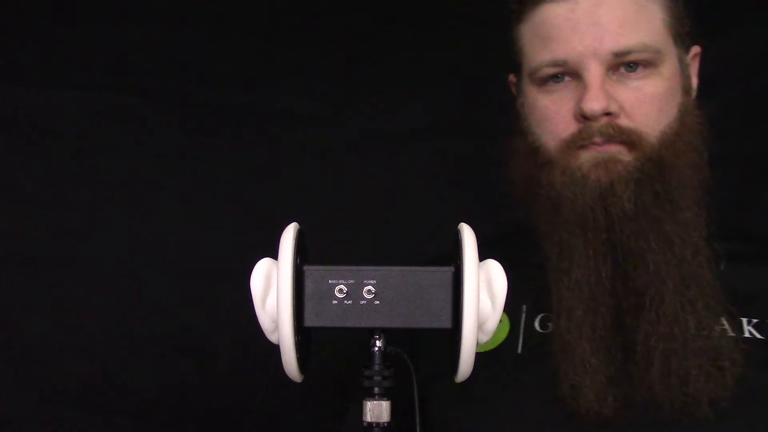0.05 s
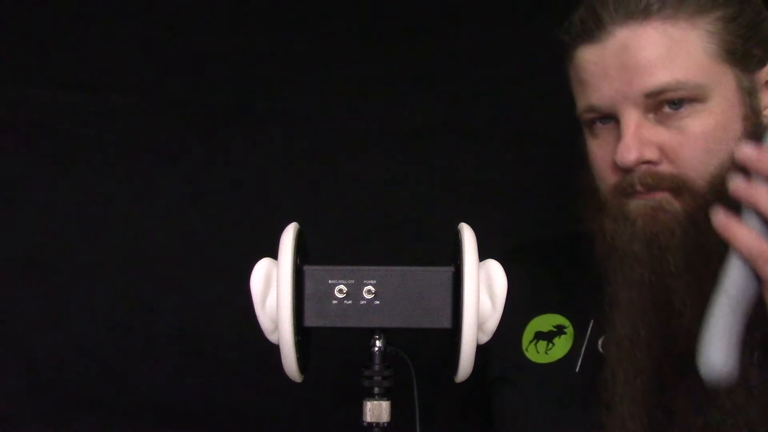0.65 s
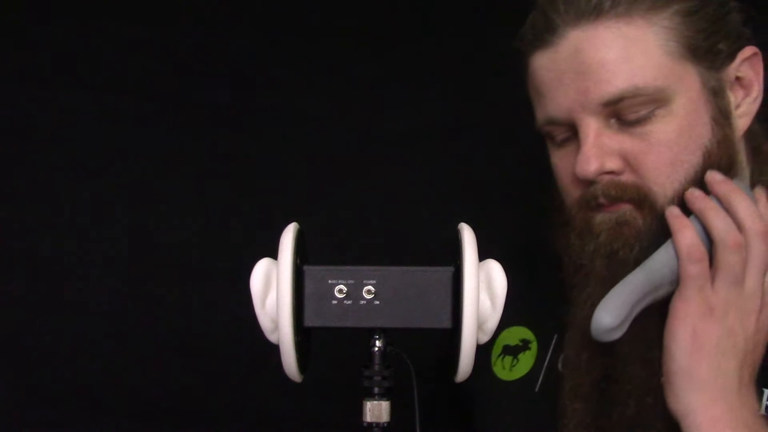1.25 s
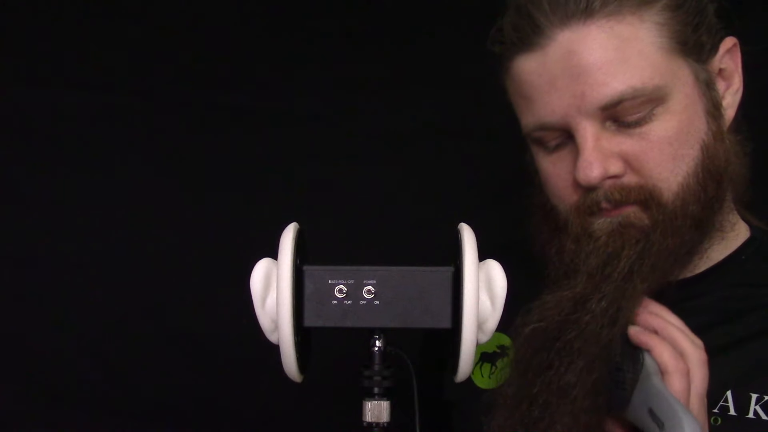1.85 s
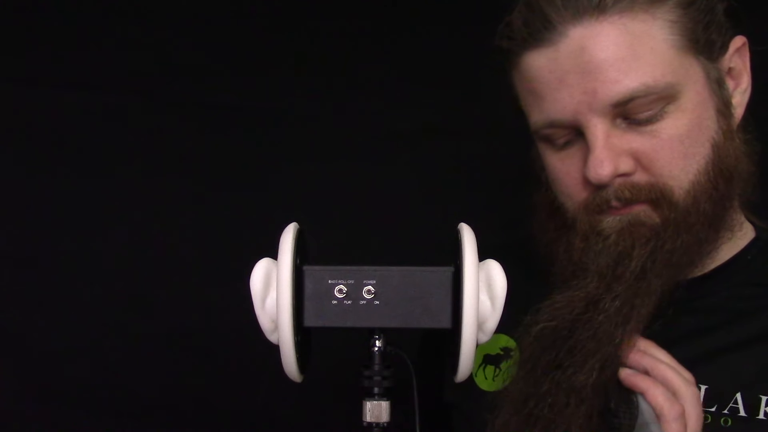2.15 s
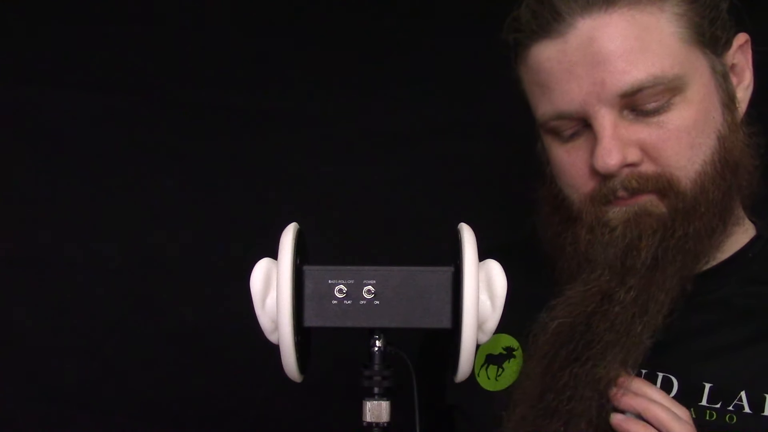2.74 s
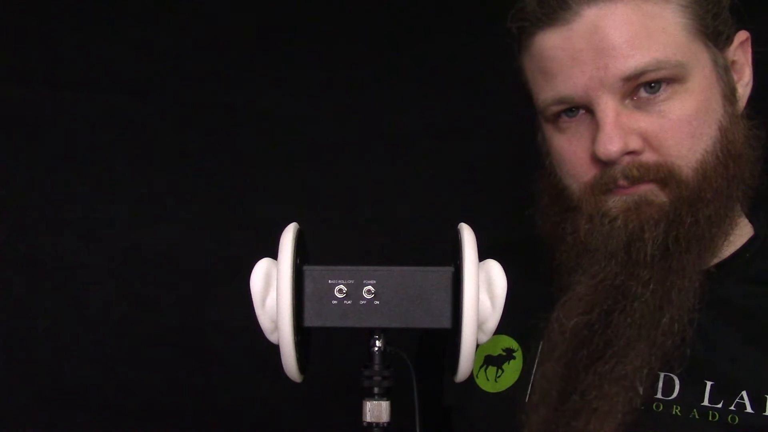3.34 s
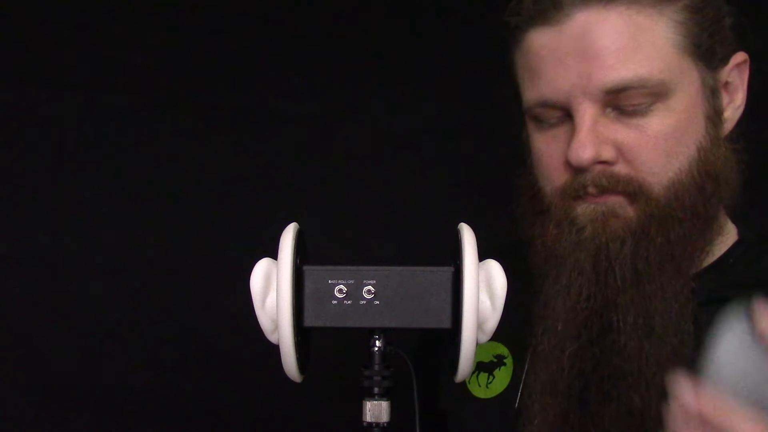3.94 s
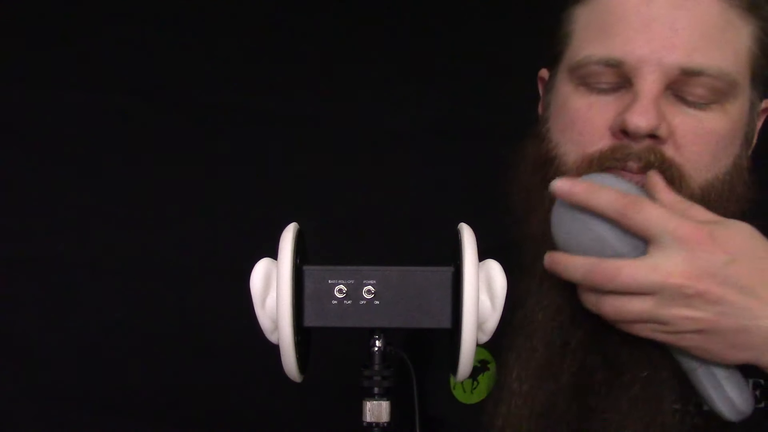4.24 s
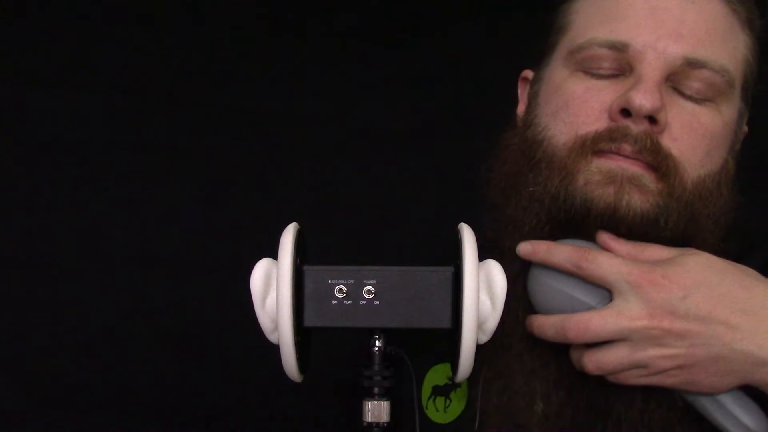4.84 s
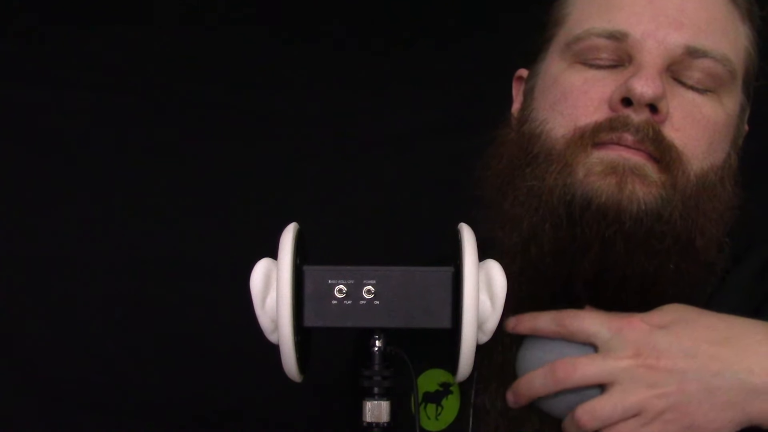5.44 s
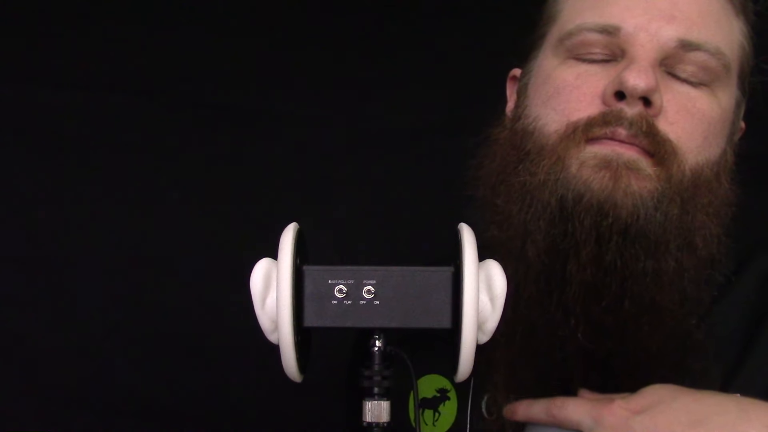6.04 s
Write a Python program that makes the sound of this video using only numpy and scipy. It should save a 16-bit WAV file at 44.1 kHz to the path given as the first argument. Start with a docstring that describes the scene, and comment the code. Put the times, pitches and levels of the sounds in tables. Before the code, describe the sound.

Two long, crackly brush strokes through a thick beard, dotted with tiny snaps and dull tugs, close on the right in a quiet room.

```python
"""In a quiet, humming room, close to the listener's right ear, a bristle brush strokes a long beard twice:
from the cheek to the tips, then from the chin down the front, each time after a few light touches.
Countless hairs rasp as they slip off the bristles, and the brush body murmurs under their drag;
tangles hold it back and knots snap free. The outer ear's peaks and notches glide as the brush travels,
while the left ear lies in the shadow of the head."""
import sys
import numpy as np
from scipy import signal
from scipy.fft import rfft, irfft, next_fast_len
from scipy.io import wavfile
from scipy.ndimage import map_coordinates

SR = 44100
rng = np.random.default_rng(int(sys.argv[2]) if len(sys.argv) > 2 else 0)


def inscribe(sig):
    """Save sig as 16-bit PCM at rate SR to the path in sys.argv[1].

    A 1-D sig is mono; a 2-D sig holds one channel per row.
    Samples are clipped to [-1, 1] before scaling.
    """
    pcm = np.round(np.clip(np.atleast_2d(sig).T, -1, 1) * 32767)
    wavfile.write(sys.argv[1], SR, pcm.astype(np.int16))


N = 268304
CHIN_FROM_S = 3.8  # between the strokes, the brush goes over from cheek to chin

# tone of a hair slipping off a bristle: (frequency [Hz], relative level [dB])
HAIR_TONE = [(300, -25.5), (700, -10), (1100, -5.5), (2000, -2), (3000, -4), (5000, -1), (7000, -5),
             (10000, -10), (13000, -13.5), (15500, -22)]
# tone of the brush body under drag: (frequency [Hz], relative level [dB])
BODY_TONE = [(30, -9), (75, -15.5), (115, -16), (170, -10.5), (230, -8.5), (310, 0.5), (385, -0.5),
             (520, -7), (700, -8.5), (1000, -22.5), (1600, -40)]
# travel of the brush down the beard: (time [s], depth [0 at the face, 1 at the tips])
BRUSH_DEPTH = [(0.85, 0.024), (1.25, 0.25), (1.8, 0.5), (2.6, 0.84), (3.55, 1), (4.3, 0.0087), (6.08, 0.97)]


def amp(db):
    """Decibels to gain."""
    return 10 ** (np.asarray(db) / 20)


def unit(x):
    """Scale to rms 1."""
    return x / np.sqrt(np.mean(x ** 2) + 1e-20)


def bell(x):
    """A smooth hump, 1 at x = 0."""
    return np.exp(-x ** 2)


def along(points, hz):
    """Read (frequency, value) points on a log frequency axis."""
    freqs, values = np.transpose(points)
    return np.interp(np.log(hz + 1), np.log(freqs + 1), values)


def envelope(points):
    """Join (time, value) points, one value per sample."""
    return np.interp(np.arange(N) / SR, *np.transpose(points))


def wobble(rate):
    """A smooth random curve through rate points a second."""
    points = rng.standard_normal(int(N * rate / SR) + 4)
    return map_coordinates(points, [np.arange(N) * rate / SR])


def filtered(x, response):
    """Shape x with a gain given as a function of frequency."""
    size = next_fast_len(N + SR // 4)
    return irfft(rfft(x, size) * response(np.fft.rfftfreq(size, 1 / SR)), size)[..., :N]


def ring(tone, size=2048):
    """Minimum-phase impulse response of energy 1 with the given tone."""
    cepstrum = irfft(np.log(amp(along(tone, np.fft.rfftfreq(size, 1 / SR)))))
    cepstrum[1:size // 2] *= 2
    cepstrum[size // 2 + 1:] = 0
    response = irfft(np.exp(rfft(cepstrum)))
    return response / np.linalg.norm(response)


def coloured(x, tone):
    """Give x a tone, keeping the power of a white input."""
    return signal.oaconvolve(x, ring(tone))[:N]


def slips(rate, scatter_db):
    """Tiny, uneven impulses at random moments, rate a second; rms 1 however the rate moves."""
    happens = rng.random(N) < rate / SR
    sizes = rng.choice([-1, 1], N) * amp(scatter_db * rng.standard_normal(N))
    return unit(happens * sizes / np.sqrt(rate))


def add(track, at_s, sound):
    """Mix a sound into the track."""
    part = track[round(at_s * SR):][:len(sound)]
    part += sound[:len(part)]


def room_tone(air_db=-50.0, waver_db=2, drift_rad=0.92, left_db=-0.7):
    """A bed of low rumble, wavering hum and faint, wide hiss."""
    # rumble and hiss: (frequency [Hz], relative level [dB])
    air_tone = [(12, -5), (21, 3.5), (27, 2.5), (33, -2), (40, -6.5), (50, -14), (70, -9.5), (105, -17.5),
                (190, -20), (280, -22), (567, -37.5), (1200, -42.5), (5400, -42), (8300, -46.5),
                (9800, -45.5), (14000, -62)]
    # hum partials: (frequency [Hz], level [dB])
    partials = [(27, -58.5), (150.7, -64), (231.5, -83)]
    # likeness of the air at the two ears: (frequency [Hz], correlation [0-1])
    likeness = [(30, 0.85), (120, 0.97), (400, 0.7), (1000, 0)]

    def mid_and_side(hz):
        width = np.arccos(np.clip(along(likeness, hz), -1, 1)) / 2
        return amp(along(air_tone, hz)) * [np.cos(width), np.sin(width)]

    mid, side = filtered(rng.standard_normal((2, N)), mid_and_side)
    air = amp(air_db) * unit(np.array([mid + side, mid - side]))
    hum, t = np.zeros(N), np.arange(N) / SR
    for hz, db in partials:
        peak = np.sqrt(2) * amp(db + waver_db * wobble(7.6))
        hum += peak * np.sin(2 * np.pi * hz * t + drift_rad * wobble(4))
    return (air + hum) * amp([[left_db], [0]])


def shirt_rub(middle_s=0.13, half_s=0.82, level_db=-62.5, centre_hz=430, octaves=0.93):
    """The beard slides over the shirt with a dull murmur as its owner leans in."""
    friction = slips(rate=1400, scatter_db=0.0)
    murmur = filtered(friction, lambda hz: bell(np.log2((hz + 1) / centre_hz) / octaves))
    return unit(murmur) * amp(level_db) * bell((np.arange(N) / SR - middle_s) / half_s)


def light_touches(gain_db=5, focus_octaves=0.25, dull_hz=12000, size=22000):
    """Hand and bristles graze the beard: brief swells of slipping hairs, each lifted around one pitch."""
    # (middle [s], half length [s], relative level [dB], pitch [Hz], lift at that pitch [dB])
    touches = [(0.02, 0.092, -66.5, 4150, 7), (0.173, 0.035, -61, 9100, 5), (0.297, 0.065, -67, 3900, 5),
               (0.44, 0.051, -65.5, 3900, 3), (0.498, 0.026, -59.5, 2480, 10),
               (0.595, 0.064, -59.5, 10000, 8), (0.67, 0.048, -57.5, 3230, 10.5),
               (0.742, 0.066, -56, 5600, 7.5), (3.523, 0.026, -60, 4540, 10),
               (4.107, 0.073, -65, 1560, 6.5), (4.18, 0.055, -66, 8550, 7), (4.28, 0.057, -57, 6400, 8)]
    track, t = np.zeros(N), np.arange(size) / SR
    hz = np.geomspace(300, 15500, num=100)
    rolloff_db = 10 * np.log10(1 + (hz / dull_hz) ** 20)
    ticks = slips(rate=4500, scatter_db=2.5)
    for k, (middle_s, half_s, db, pitch_hz, lift_db) in enumerate(touches):
        focus_db = lift_db * bell(np.log2(hz / pitch_hz) / focus_octaves)
        tone = np.column_stack([hz, along(HAIR_TONE, hz) + focus_db - rolloff_db])
        swish = signal.fftconvolve(ticks[k * size:][:size], ring(tone))[:size]
        start_s = max(middle_s - t[-1] / 2, 0)
        swell = bell((start_s + t - middle_s) / half_s) ** 0.5
        add(track, start_s, swish * amp(db + gain_db) * swell)
    return track


def knot_snaps(pop_gain_db=-1.5, tick_gain_db=-0.5, pop_rise_s=0.00048, size=2048):
    """A knot lets go: the bristle gives a hollow pop and the hairs tear loose with a dry tick."""
    # (time [s], relative pop level [dB], pop pitch [Hz], relative tick level [dB], tear decay [s])
    knots = [(0.486, -45, 1500, -64, 0.002), (0.534, -54, 2200, -50, 0.0008),
             (0.565, -42.5, 1900, -62, 0.002), (1.1866, -26, 2350, -36, 0.002),
             (1.4257, -27, 2280, -44, 0.002), (1.4637, -25, 2250, -44, 0.003),
             (1.5572, -40, 2300, -31, 0.0008), (1.6235, -25.5, 2250, -42, 0.002),
             (2.2925, -25, 2300, -43, 0.001), (2.8268, -38, 2300, -37.5, 0.0012),
             (2.8527, -34, 2300, -36, 0.003), (4.3941, -30, 1600, -44, 0.001),
             (4.4495, -29, 1900, -41, 0.002), (4.4575, -27, 1650, -35, 0.002),
             (4.502, -33, 2000, -41, 0.001), (4.6525, -18.5, 1950, -33, 0.0012),
             (4.7942, -30, 2000, -32, 0.001), (4.798, -26, 2100, -39, 0.001),
             (4.804, -18.7, 1850, -29, 0.0012), (4.904, -33, 2000, -36, 0.001),
             (4.913, -31, 1800, -34, 0.0015), (4.9946, -34, 2300, -33, 0.001),
             (5.3526, -24.5, 2500, -42, 0.001), (5.5623, -30, 1900, -36, 0.001),
             (5.819, -35, 2700, -39, 0.001), (6.0495, -46, 2700, -42, 0.001)]
    # hairs tearing loose: (frequency [Hz], relative level [dB])
    tick_tone = [(1000, -26), (3300, -13.5), (4300, -2), (5100, -2.5), (5900, -1), (6800, -16.5),
                 (9000, -11), (15000, -43)]
    track, t = np.zeros(N), np.arange(size) / SR
    for at_s, pop_db, pop_hz, tick_db, tear_s in knots:
        pop = t / pop_rise_s * np.exp(1 - t / pop_rise_s) * np.sin(2 * np.pi * pop_hz * t)
        tear = np.exp(-t / tear_s) * rng.standard_normal(size)
        tick = signal.fftconvolve(tear, ring(tick_tone))[:size]
        tick *= np.sqrt(0.004 * SR) / np.linalg.norm(tick)  # the energy of 4 ms at rms 1
        add(track, at_s, amp(pop_db + pop_gain_db) * pop + amp(tick_db + tick_gain_db) * tick)
    return track


def tuft_tugs(gain_db=2):
    """Tufts catch and jerk the brush body with a dull knock."""
    # (time [s], relative peak level [dB])
    tugs = [(0.488, -45.5), (1.506, -38), (1.616, -29), (1.631, -35), (2.069, -31.5), (2.295, -33.5),
            (2.856, -33), (2.951, -39), (4.369, -59), (4.444, -35.5), (5.021, -28), (5.349, -27),
            (5.56, -30.5), (5.602, -28), (5.772, -36), (5.902, -36)]
    track, knock = np.zeros(N), ring(BODY_TONE)
    for at_s, db in tugs:
        add(track, at_s, amp(db + gain_db) * knock / np.abs(knock).max())
    return track


def brush_landings(push_hz=110, rise_s=0.0042):
    """The brush settles on the beard with a soft, low push."""
    # (time [s], envelope peak [dB])
    landings = [(0.49, -47.5), (4.363, -54)]
    track, t = np.zeros(N), np.arange(SR // 10) / SR
    push = t / rise_s * np.exp(1 - t / rise_s) * np.sin(2 * np.pi * push_hz * t)
    for at_s, db in landings:
        add(track, at_s, amp(db) * push)
    return track


def pull_effort(build_s=0.019, release_s=0.0082, tangle_drag_db=-4, fade_db_per_s=508):
    """Envelopes of hair rasp and body drag in dB: both follow the pull and build against each tangle."""
    # pull down from the cheek: (time [s], relative rasp level [dB])
    cheek = [(0.84, -55.5), (0.872, -51), (1.052, -43), (1.554, -39.5), (1.718, -43.5), (2.2, -47),
             (2.45, -51), (2.592, -48.5), (2.72, -59.5)]
    # pull on through the tips: (time [s], relative rasp level [dB])
    tips = [(2.72, -60), (2.76, -55.5), (2.846, -49.5), (2.856, -46.5), (2.9, -45.5), (3.086, -55.5),
            (3.186, -54.5), (3.42, -56.5), (3.526, -55.5), (3.564, -60), (3.63, -80)]
    # pull down from the chin: (time [s], relative rasp level [dB])
    chin = [(4.3, -58), (4.368, -43.5), (4.48, -43), (4.53, -45.5), (4.58, -41), (4.66, -43.5),
            (4.75, -43.5), (4.8, -39.5), (4.91, -39), (4.96, -40.8), (5.0, -36.8), (5.42, -40.5),
            (5.46, -42.5), (5.66, -41.5), (6.08, -49)]
    # tangles holding the brush back: (release time [s], relative level of the added rasp [dB])
    tangles = [(1.64, -46), (4.461, -42), (4.651, -39.5), (4.805, -40.5), (4.916, -42)]
    t, depth = np.arange(N) / SR, envelope(BRUSH_DEPTH)
    rasp_power = np.zeros(N)
    for at_s, db in tangles:
        rasp_power += amp(db) ** 2 * np.exp(-np.maximum((at_s - t) / build_s, (t - at_s) / release_s))
    drag_power = rasp_power * amp(tangle_drag_db) ** 2
    # the drag sits under the rasp and grows from face to tips
    for pull, drag_db, growth_db in (cheek, -7, 4), (tips, -7, 1.9), (chin, -8.5, 1.8):
        outside_s = np.abs(t - np.clip(t, pull[0][0], pull[-1][0]))
        power = amp(envelope(pull) - fade_db_per_s * outside_s) ** 2
        rasp_power += power
        drag_power += power * amp(drag_db + growth_db * depth) ** 2
    return 10 * np.log10(rasp_power), 10 * np.log10(drag_power)


def brushing(rasp_db, drag_db, rasp_gain_db=5, drag_gain_db=4, clump_db=0.81, lurch_db=1.0):
    """Hairs slip off in clumps while the brush body murmurs; a harder pull is louder and denser."""
    # a single bristle flicking free: (frequency [Hz], relative level [dB])
    flick_tone = [(700, -30), (1500, -10), (2000, -9), (2300, 0.5), (2650, -11.5), (3600, -16), (9000, -45)]
    effort = amp(rasp_db - rasp_db.max())
    clumps = wobble(70)
    ticks = slips(rate=7000 + 9000 * effort, scatter_db=0.5)
    crackle = amp(-12) * slips(rate=130, scatter_db=2.0)
    flicks = amp(-17) * coloured(slips(rate=70, scatter_db=2.0), flick_tone)
    hairs = outer_ear(coloured(ticks + crackle, HAIR_TONE) + flicks)
    lurches = slips(rate=1500, scatter_db=1.5) * amp(lurch_db * clumps)
    body = unit(coloured(lurches, BODY_TONE))
    return hairs * amp(rasp_db + rasp_gain_db + clump_db * clumps) + body * amp(drag_db + drag_gain_db)


def outer_ear(rasp, sizzle_depth=0.67, size=512):
    """The ear's peaks and notches glide as the brush travels, recolouring the rasp at even loudness."""
    # peaks and notches with the brush at the cheek: (centre at the face [Hz], centre at the tips [Hz],
    # half width [Hz], gain [dB], depth where strongest [0-1], reach in depth [0-1])
    cheek_bands = [(1200, 1300, 810, -6, 1, 0.77), (2030, 1100, 640, 6, 0.066, 0.058),
                   (2360, 2370, 176, 6, 0.68, 0.38), (5430, 3350, 220, -6, 0.82, 0.22),
                   (5860, 7200, 800, 6.5, 0.051, 0.26), (7250, 5400, 670, 5, 0.91, 0.38),
                   (9640, 6000, 760, -5, 0.76, 0.19), (10970, 10000, 1400, -8.5, 0.2, 0.11),
                   (12800, 8870, 1060, 5.5, 0.79, 0.69), (9780, 8800, 440, 5, 0.64, 0.13),
                   (3660, 3200, 120, 2.5, 0.65, 1), (6700, 6000, 290, -2, 0.95, 0.05),
                   (2450, 2200, 430, -9, 1, 0.023), (4350, 4000, 240, 4, 1, 0.042),
                   (7500, 7800, 500, -6, 1, 0.035)]
    # the same columns with the brush in front of the chin
    chin_bands = [(1380, 1920, 480, -6.5, 0.76, 0.65), (2480, 2960, 510, 7, 1, 0.83),
                  (2900, 3420, 530, -8, 0.51, 0.31), (4450, 4200, 610, 7.5, 0.448, 0.14),
                  (4270, 4550, 470, 10.5, 0.857, 0.19), (6300, 9400, 930, 8.5, 0.059, 0.16),
                  (5530, 6010, 360, 10.5, 0.64, 0.25), (8550, 8360, 600, -6, 0.65, 0.28),
                  (9000, 8660, 1130, 4.5, 0.59, 1), (11840, 10800, 730, -5.5, 1, 0.23),
                  (5040, 4600, 450, 4.5, 0.236, 0.08), (2400, 2420, 100, 3, 0.41, 0.08),
                  (1465, 1580, 97, 8.5, 0.061, 0.4), (14330, 17000, 1190, -7, 0.27, 0.14),
                  (4300, 5800, 350, -4, 0, 0.12), (7800, 6600, 270, 7, 0, 0.08),
                  (3300, 3750, 220, -1, 0.5, 0.25), (3850, 3950, 170, 3.5, 0.54, 0.16),
                  (5900, 5900, 260, -4, 0.15, 0.08), (9200, 10000, 310, 4, 0.22, 0.07)]
    hz, t, frames = signal.stft(rasp, SR, nperseg=size)
    depth = np.interp(t, *np.transpose(BRUSH_DEPTH))
    # free-hanging hair sizzles more than hair lying on the skin
    treble_weight = along([(9000, 0.25), (14500, 0.76)], hz)
    gain_db = np.outer(treble_weight, 1.5 - 49 * (depth - sizzle_depth) ** 2)
    for bands, active in (cheek_bands, t < CHIN_FROM_S), (chin_bands, t >= CHIN_FROM_S):
        for face_hz, tips_hz, width_hz, db, strongest, reach in bands:
            centre_hz = face_hz + (tips_hz - face_hz) * depth[active]
            strength = bell((depth[active] - strongest) / reach)
            gain_db[:, active] += db * strength * bell((hz[:, None] - centre_hz) / width_hz)
    power, gain = amp(along(HAIR_TONE, hz)) ** 2, amp(gain_db)
    loudness = np.sqrt(power @ gain ** 2 / power.sum())
    return signal.istft(frames * gain / loudness, SR, nperseg=size)[1][:N]


def hard_presses():
    """Pressed hard, the bristles stiffen and the brush body murmurs higher and louder."""
    # over the jaw and under the chin: (middle [s], half length [s], level [dB], pitch shift [ratio])
    presses = [(1.58, 0.17, -47, 1.4), (5.17, 0.27, -45, 1.05)]
    track, t = np.zeros(N), np.arange(N) / SR
    for middle_s, half_s, db, shift in presses:
        stiff_tone = [(hz * shift, level) for hz, level in BODY_TONE]
        murmur = coloured(slips(rate=1500, scatter_db=0.5), stiff_tone)
        track += unit(murmur) * amp(db) * bell((t - middle_s) / half_s)
    return track


def head_shadow(near, scatter, far_db, lag_s):
    """Left and right: the far, left ear hears it late and dull, with scatter from chest and room."""
    # tone at the far ear: (frequency [Hz], gain on top of far_db [dB])
    shadow_tone = [(100, 9.5), (330, 5.5), (700, 7), (1100, 6), (1600, 4.5), (2500, 2), (3600, 3.5),
                   (4800, -3.5), (6500, -6.5), (10000, -8), (12500, -8), (14000, -47)]
    # sound bending straight round the head: (frequency [Hz], share of the far ear's power [0-1])
    direct_share = [(300, 0.68), (1000, 0.5), (2200, 0.25), (4000, 0.059), (8000, 0.064)]

    def direct_and_scatter(hz):
        share = np.clip(along(direct_share, hz), 0, 1)
        return amp(along(shadow_tone, hz)) * np.sqrt([share, 1 - share])

    late = map_coordinates(near, [np.arange(N) - lag_s * SR])
    far = filtered(np.array([late, scatter]), direct_and_scatter).sum(0)
    return np.array([far * amp(far_db), near])


def scene(ear_depth=0.35):
    """Both strokes pass the right ear; level with it, the head shadows and delays the left side most."""
    at_cheek = np.arange(N) / SR < CHIN_FROM_S
    off_axis = (envelope(BRUSH_DEPTH) - ear_depth) ** 2
    far_db = np.where(at_cheek, -14, -16.5) + 6 * off_axis
    lag_s = np.where(at_cheek, 0.00062, 0.00061) - 0.00032 * off_axis
    rasp_db, drag_db = pull_effort()
    brush = brushing(rasp_db, drag_db) + hard_presses() + knot_snaps() + tuft_tugs() + brush_landings()
    scatter = brushing(rasp_db, drag_db)  # the same pull with a fresh grain
    strokes = head_shadow(brush, scatter, far_db, lag_s)
    rustle = head_shadow(light_touches() + shirt_rub(), light_touches(), far_db=-9.5, lag_s=0.00052)
    return strokes + rustle + room_tone()


def record(dry, top_hz=15725):
    """A brick-wall low-pass takes off the very top."""
    return filtered(dry, lambda hz: hz < top_hz)


dry = scene()
out = record(dry)
inscribe(out)
```